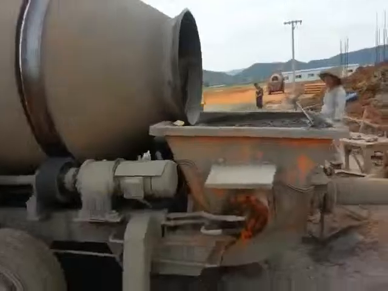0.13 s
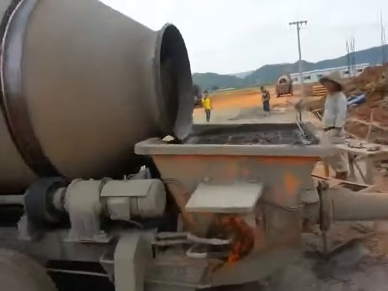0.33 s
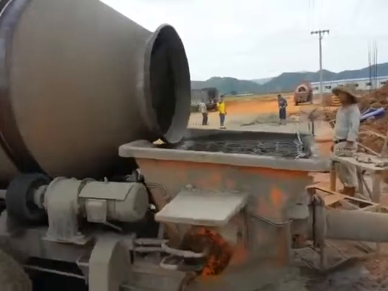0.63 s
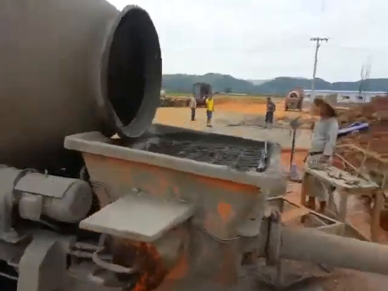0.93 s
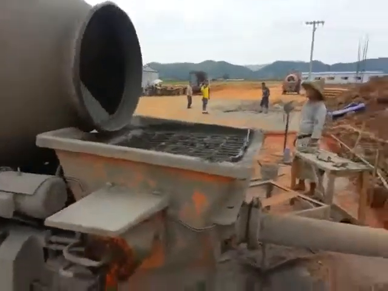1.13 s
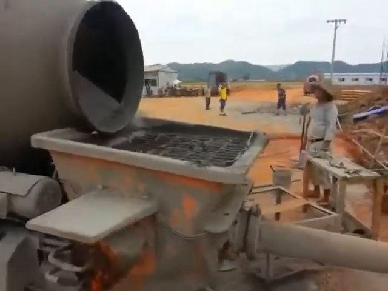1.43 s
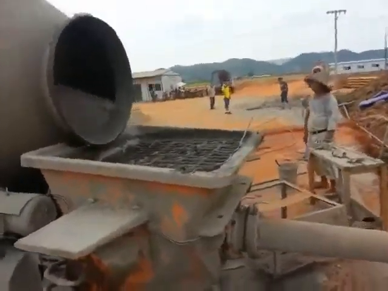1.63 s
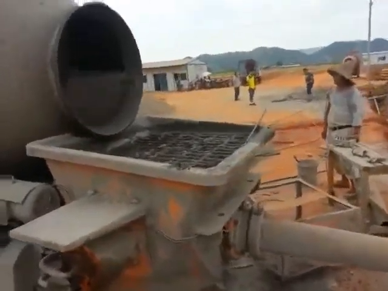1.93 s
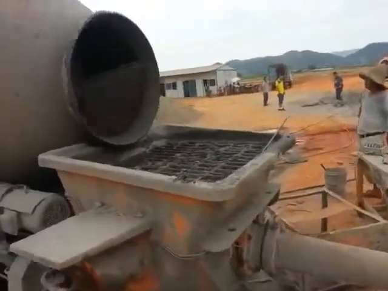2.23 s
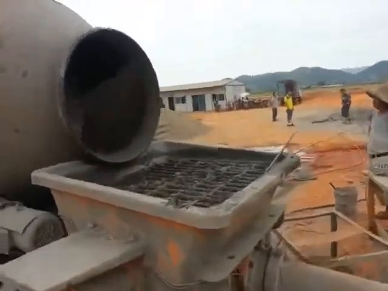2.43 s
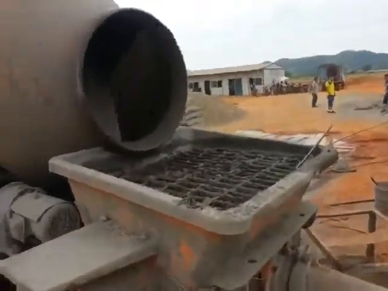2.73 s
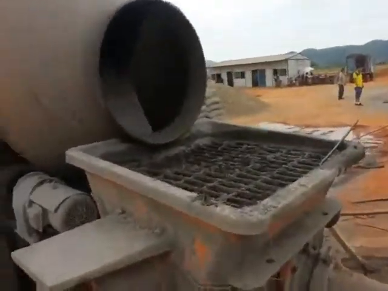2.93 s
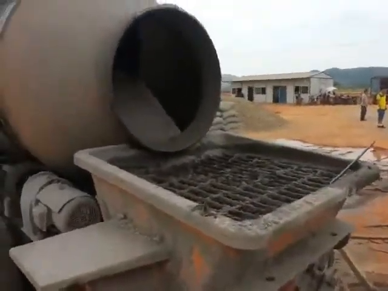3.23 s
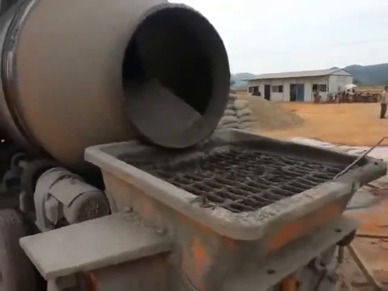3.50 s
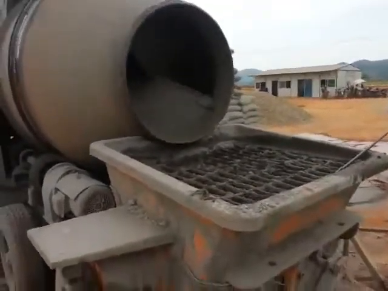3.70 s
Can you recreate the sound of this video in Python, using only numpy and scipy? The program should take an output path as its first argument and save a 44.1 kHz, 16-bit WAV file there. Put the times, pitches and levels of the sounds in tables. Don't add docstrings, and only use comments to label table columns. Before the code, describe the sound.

Loud concrete mixing machine with throbbing gear whine, roaring fans and stones knocking inside a steel drum.

```python
import sys
import numpy as np
from scipy import signal
from scipy.io import wavfile
from scipy.ndimage import uniform_filter1d

SR = 44100
rng = np.random.default_rng(int(sys.argv[2]) if len(sys.argv) > 2 else 0)


def ratio(d):
    e = np.asarray(d, float) / 20
    return 10 ** e


def to_wav(sig):
    pcm = np.clip(np.atleast_2d(sig), -1, 1) * 32767
    pcm = np.round(pcm).astype(np.int16)
    wavfile.write(sys.argv[1], SR, pcm.T)


N = 170226

TOP_HZ = 7660
BIGGEST_STONE = 4


def table(rows, t):
    rows = np.array(rows, float)
    return [np.interp(t, rows[:, 0], col) for col in rows.T[1:]]


def spectrum_db(rows, hz):
    rows = np.array(rows)
    return np.interp(np.log(hz), np.log(rows[:, 0]), rows[:, 1])


def level(x, db):
    return x * ratio(db) / np.sqrt(np.mean(x ** 2))


def band(x, hz, width):
    return signal.lfilter(*signal.iirpeak(min(hz, SR / 2.2), hz / width, fs=SR), x)


def noise_band(hz, width, db):
    return level(band(band(rng.standard_normal(N), hz, width), hz, width), db)


def walk(rate_hz):
    hold = int(SR / rate_hz)
    steps = np.repeat(rng.standard_normal(400)[:N // hold + 1], hold)
    return 1.3 * uniform_filter1d(uniform_filter1d(steps, hold), hold)[:N]


def tone(turns, db):
    return np.sqrt(2) * ratio(db) * np.sin(2 * np.pi * (turns + rng.random()))


def bump(t, at, width):
    return np.exp(-.5 * ((t - at) / width) ** 2)


def stone_hits(per_s, spread_db):
    size = np.minimum(rng.exponential(size=N), BIGGEST_STONE)
    return (rng.random(N) < per_s / SR) * ratio(spread_db * size)


def rising_notes(t, rows, shift_db, slower):
    rise_s, decay_s, glide = .003 * slower, .012 * slower, .02
    out = 0
    for (at, db, hz), start in zip(rows, rng.random(len(rows))):
        age = np.clip(t - at, 0, 1)
        shape = (1 - np.exp(-age / rise_s)) * np.exp(-age / decay_s)
        turns = start + hz * age * (1 + glide * age / decay_s / 2)
        out = out + 2 * ratio(db + shift_db) * shape * np.sin(2 * np.pi * turns)
    return out


def roar(mouth_db, side_db):
    # pitch_hz, level_db [dB per Hz]
    fan_spectrum = [(15, -51), (25, -15), (391, -7.5), (474, -8.5), (534, -4.5), (662, -15.5), (1610, -10),
                    (3620, -27.5), (7600, -14), (9880, -45), (16700, -120)]
    # pitch_hz, width_hz, level_db
    panels = [(345.8, 19, -38), (515.2, 24, -34), (778, 90, -34.5), (1080, 100, -39), (2010, 140, -35.5),
              (4510, 1000, -31.5), (7290, 1800, -24.5)]
    roar_db, swell_db, flicker_db = -20, -0.76, 0.57

    def near(hz, centre_hz):
        return np.exp(-.5 * (np.log2(hz / centre_hz) / 0.87) ** 2)

    def facing(hz):
        return mouth_db * near(hz, 900) + side_db * near(hz, 4700) ** 7

    air, swell = 0, walk(4.74)
    for hz in 28 * 2 ** (np.arange(25) / 3):
        db = spectrum_db(fan_spectrum, hz) + 10 * np.log10(hz)
        sway_db = swell_db * swell + flicker_db * walk(6.9) + facing(hz)
        air = air + noise_band(hz, hz / 3, db) * ratio(sway_db)
    ring = sum(noise_band(hz, width, db) * ratio(1.4 * walk(7.4) + facing(hz)) for hz, width, db in panels)
    return level(air, roar_db) + ring


def diesel(t):
    # start_s, main_hz (the strong exhaust tone, twice the firing rate), level_db
    revs = [
        (1.901, 72.4, -39.5),
        (2.128, 77.9, -33),
        (2.465, 77.3, -35),
        (2.725, 84.3, -33.5),
        (3.046, 83.9, -33.5),
        (3.36, 81.37, -34.5),
        (3.762, 81.4, -36),
        (3.772, 82, -38),
        (3.85, 79, -33),
    ]
    # multiple of the main tone's pitch, level_db [re main tone]
    orders = [(1.5, -4), (2, -4), (2.5, -1), (3, -12)]
    idle_db, scatter_db, scatter_hz = -49, 3.5, 16
    idle = (revs[0][0] - .3, revs[0][1], idle_db)
    hz, db = table([idle] + list(revs), t)
    turns = np.cumsum(hz) / SR
    out = tone(turns, db)
    for k, rel_db in orders:
        out = out + tone(k * turns, db + rel_db + scatter_db * walk(scatter_hz))
    return out


def pump(t):
    # multiple of shaft speed, level_db
    orders = [(8, -39), (18, -38.5), (20, -58.5), (24, -44), (27, -45), (36, -42)]
    # pitch_hz, level_db
    motors = [(48.2, -51), (339, -45.5), (356.4, -38.5)]
    # start_s, order_16_db, order_9_db
    strong_tones = [(0.1, -26.5, -31.5), (0.4, -33.5, -32), (0.51, -29, -36.5), (0.76, -26, -36.5),
                    (0.85, -36, -31.5), (0.98, -30, -29), (1.04, -33, -45), (1.1, -35, -28),
                    (1.15, -36, -38), (1.43, -27, -45), (1.81, -30.5, -29), (2.61, -32, -43),
                    (2.72, -29.5, -27.5), (2.94, -30.5, -35.5), (3.82, -34, -39.5), (3.85, -36, -40)]
    shaft_hz, sway_db = 24.97, 4
    lines = [(k * shaft_hz, db) for k, db in orders] + list(motors)
    strong = sum(tone(k * shaft_hz * t, db) for k, db in zip((16, 9), table(strong_tones, t)))
    return strong + sum(tone(hz * t, db + sway_db * walk(4.4)) for hz, db in lines)


def gears(t):
    # start_s, pitch_hz
    mesh = [(0.1, 545.5), (0.54, 544), (0.7, 542.5), (1.01, 544.5), (1.25, 546), (1.5, 541), (1.78, 544),
            (1.95, 546), (2.36, 543), (2.65, 542), (2.83, 545), (3.09, 541), (3.4, 543.5), (3.64, 546),
            (3.85, 543.5)]
    # multiple of whine pitch, level_db [re whine]
    orders = [(2, -11.5), (3, -14.5), (4, -34)]
    # centre_s, level_db, width_s
    heaves = [(.16, -20.5, 0.052), (.27, -20.5, 0.033), (.41, -23.5, 0.04), (.525, -21, 0.031),
              (.65, -28, .03), (.8, -27, 0.041), (.965, -21.5, 0.063), (1.05, -29.5, 0.031),
              (1.17, -24, 0.041), (1.25, -27.5, 0.021), (1.34, -26, 0.058), (1.56, -28.5, .04),
              (1.66, -23.5, 0.035), (1.77, -27, 0.039), (1.895, -23, 0.01), (2.005, -22, 0.045),
              (2.2, -19.5, .035), (2.265, -18, 0.0082), (2.45, -23, 0.056), (2.62, -32, 0.021),
              (2.73, -23.5, 0.019), (2.78, -23, 0.019), (2.96, -25, 0.018), (3.05, -23, .025),
              (3.175, -24, 0.023), (3.23, -23, 0.0255), (3.285, -22, 0.014), (3.44, -32, 0.016),
              (3.55, -29, 0.031), (3.63, -33, .025), (3.69, -27.5, 0.011), (3.75, -23, 0.022)]
    teeth, sideband_depth, pitch_jitter, rest_db = 22, .35, .003, -33
    throb_db, throb_hz = 1.4, 24
    turns = np.cumsum(table(mesh, t)[0] * (1 + pitch_jitter * walk(25.0))) / SR
    load = ratio(rest_db) + sum(ratio(db) * bump(t, at, width) for at, db, width in heaves)
    shaft = 1 + sideband_depth * np.sin(2 * np.pi * turns / teeth)
    out = load * tone(turns, throb_db * walk(throb_hz))
    for k, rel_db in orders:
        fade_db = 2.5 * t * (k == 2)
        out = out + load ** 0.59 * tone(k * turns, -7.0 + rel_db - fade_db + walk(16))
    return shaft * out


def gravel(mouth_db):
    # pitch_hz, width_hz, level_db
    drum = [(870, 500, -30.5), (1350, 600, -33), (2420, 1100, -26.5), (3130, 2200, -37), (5100, 1600, -33)]
    per_s, spread_db, tail_s = 2500, 2.5, .0025
    puff = signal.lfilter([1], [1, -np.exp(-1 / (tail_s * SR))], stone_hits(per_s, spread_db))
    rattle = sum(level(band(puff * rng.standard_normal(N), hz, width), db) for hz, width, db in drum)
    return ratio(mouth_db + 0.77 * walk(11)) * rattle


def shell(mouth_db):
    # pitch_hz, level_db [per tone]
    pings = [(650, -43), (1300, -41.5), (2200, -40.5), (3500, -47.5), (4800, -41.5), (5900, -47.5),
             (7500, -38)]
    modes, pings_per_s, spread_db, t60_s = 110, 40, 2.5, 0.12
    out = 0
    for hz in np.linspace(25, 87, modes) ** 2 * (1 + .01 * rng.standard_normal(modes)):
        hits = stone_hits(pings_per_s, spread_db)
        width = np.log(1000) / (np.pi * t60_s) * max(hz / 3000, 1) ** 0.81
        out = out + level(band(band(hits, hz, width), hz, 4 * width), spectrum_db(pings, hz))
    return out * ratio(mouth_db / 2)


def sand():
    return noise_band(3050, 1700, -30.5)


def ticks(t):
    # start_s, peak_db
    grit = [(.3265, -14), (.344, -14), (.366, -10), (.387, -12), (.655, -12), (.705, -12), (.7545, -10),
            (.8695, -12), (2.1415, -13), (2.3472, -5), (2.3515, -8), (2.7115, -12), (2.8345, -9)]
    hiss_db, decay_s, low_hz = -11.5, .0025, 3900
    bright = signal.butter(2, [low_hz, TOP_HZ], "band", fs=SR, output="sos")
    hiss = level(signal.sosfilt(bright, rng.standard_normal(N)), hiss_db)
    return hiss * sum(2 * ratio(db) * (t > at) * np.exp(-np.clip(t - at, 0, 1) / decay_s) for at, db in grit)


def clanks(t):
    # peak_s, pitch_hz, level_db, decay_s
    knocks = [(.328, 7300, -17, .004), (.348, 6800, -20, .006), (.365, 6500, -15, .006),
              (.35, 2000, -21, .016), (2.684, 756, -18, .008), (3.418, 200, -20, .012),
              (2.733, 216, -19, .011), (2.725, 1620, -24, .02), (2.823, 220, -19, .012),
              (2.905, 225, -23, .014), (2.95, 985, -22, .025)]
    out = 0
    for at, hz, db, decay in knocks:
        age = np.clip(t - at + decay / 2, 0, 1) / decay
        ring = level(band(rng.standard_normal(N), hz, hz / 3.5), db)
        out = out + ring * 5.4 * age * np.exp(-2 * age)
    return out


def thuds(t):
    # start_s, peak_db, pitch_hz
    drops = [(0.356, -19, 193), (0.52, -14, 187), (1.235, -15.5, 161), (1.813, -16, 221), (2.161, -16, 185),
             (2.318, -10, 195.6), (2.416, -21, 200), (2.603, -19, 200), (2.725, -13.5, 216),
             (2.865, -19, 186), (3.053, -14, 230), (3.25, -15, 214), (3.412, -13.5, 194), (3.774, -16, 256)]
    return rising_notes(t, drops, shift_db=-10.5, slower=2.2)


def stones(t):
    # start_s, peak_db, pitch_hz
    blows = [(0.083, -10, 1590), (0.185, -6.5, 1100), (0.255, -11, 1920), (0.273, -11, 1090),
             (0.348, -9, 2030), (0.397, -5.5, 1052), (0.512, -12, 1080), (0.568, -7, 1095),
             (0.603, -13, 1115), (0.616, -13, 2210), (0.644, -9.5, 1920), (0.935, -16, 1640),
             (1.025, -9, 1436), (1.162, -13, 1213), (1.243, -12, 640), (1.264, -14, 1630),
             (1.303, -17, 725), (1.349, -12, 1590), (1.385, -10, 1033), (1.518, -7, 1630),
             (1.56, -12, 1570), (1.752, -11, 748), (1.892, -16, 1670), (2.093, -9, 1535),
             (2.163, -7.5, 1090), (2.224, -9, 1074), (2.364, -13, 1290), (2.397, -15, 1070),
             (2.425, -11, 1060), (2.558, -14, 1980), (2.632, -12, 893), (2.679, -10, 713),
             (2.716, -9, 1610), (2.864, -15, 1390), (2.887, -17, 2010), (2.942, -4.5, 667),
             (3.008, -16, 790), (3.31, -7, 886), (3.341, -6, 2070), (3.465, -10, 2050), (3.56, -7, 1148),
             (3.633, -6, 1533), (3.701, -8, 1675), (3.757, -12, 762)]
    return rising_notes(t, blows, shift_db=-10.5, slower=0.78)


def scene():
    # start_s, drum_mouth_db, fan_side_db
    pointing = [(.1, 0.1, -4), (.3, -2.5, -0.5), (.55, -4.5, 2.2), (.75, -0.8, 4), (1.0, 0.9, 3.5),
                (1.3, -1.5, -0.3), (1.6, -1.2, 5.5), (1.9, -0.8, 4), (2.2, 0, -1.5), (2.45, -1.5, 0),
                (2.8, -0.3, 1), (2.92, 3, -7.5), (3.12, 2.5, -7), (3.3, 0, -2.5), (3.45, 1.5, -1.5),
                (3.55, -2, -3), (3.7, -0.5, 3), (3.85, -1.5, -5.5)]
    surge_s, surge_rise_s, surge_db = 3.4, 0.023, 1.5
    lumps_db, lumps_hz = .9, 30
    t = np.arange(N) / SR
    mouth_db, side_db = table(pointing, t)
    steady = roar(mouth_db, side_db) + diesel(t) + pump(t) + gears(t)
    surge = np.clip((t - surge_s) / surge_rise_s, 0, 1)
    tumble_db = surge * surge_db + (.5 + surge / 2) * lumps_db * walk(lumps_hz)
    drum = (gravel(mouth_db) + shell(mouth_db)) * ratio(tumble_db)
    knocks = ticks(t) + clanks(t) + thuds(t) + stones(t)
    return (steady + drum + knocks + surge * sand())[None]


def top_cut(x):
    return signal.sosfilt(signal.butter(12, 9030, fs=SR, output="sos"), x)


def record(dry):
    # centre_s, depth_db, width_s
    ducks = [(0.246, 3.5, 0.0086), (0.376, 4.5, 0.0034), (0.557, 0.5, .005), (0.596, 4, 0.0084),
             (0.743, 4, 0.0077), (0.811, 3, 0.02), (1.019, 1.5, 0.011), (1.21, 1, 0.013),
             (1.506, 4, 0.0031), (2.021, 1.5, 0.029), (2.14, 2.5, 0.01), (2.356, 1.5, 0.0044),
             (2.696, 2, 0.0021), (2.703, 7.5, 0.0042), (2.844, 4, .0045), (2.854, 6.5, 0.0035),
             (2.361, 3.5, 0.0036), (3.74, 1.5, 0.0087)]
    # centre_s, width_s
    flutters = [
        (.36, 0.03),
        (.56, 0.014),
        (.645, 0.022),
        (0.729, 0.034),
        (1.514, 0.0082),
        (2.1, 0.013),
        (2.35, 0.0057),
        (2.7, 0.015),
        (2.85, .03),
    ]
    low_cut_hz, clip_db, start_s, fade_s = 38, 3, 0.0756, 0.012
    flutter_db, flutter_hz = -20, 250
    t = np.arange(N) / SR
    mic = signal.sosfilt(signal.butter(2, low_cut_hz, "high", fs=SR, output="sos"), dry)
    mic = ratio(clip_db) * np.tanh(mic / ratio(clip_db))
    mic = mic * np.clip((t - start_s) / fade_s, 0, 1)
    narrow = signal.sosfilt(signal.ellip(18, .5, 120, TOP_HZ, fs=SR, output="sos"), mic)
    duck_db = sum(-db * bump(t, at, width) for at, db, width in ducks)
    slow = signal.butter(2, flutter_hz, fs=SR, output="sos")
    shake = level(signal.sosfilt(slow, rng.standard_normal(N)), flutter_db)
    flutter = 1 + shake * sum(bump(t, at, width) for at, width in flutters)
    return top_cut(narrow * ratio(duck_db) * flutter)


dry = scene()
out = record(dry)
to_wav(out)
```